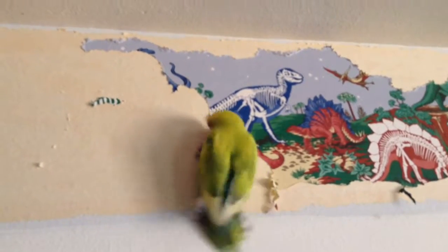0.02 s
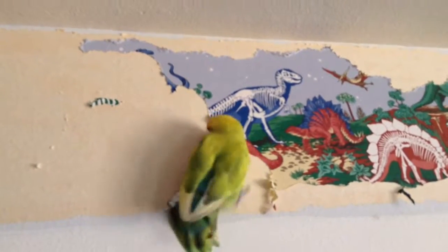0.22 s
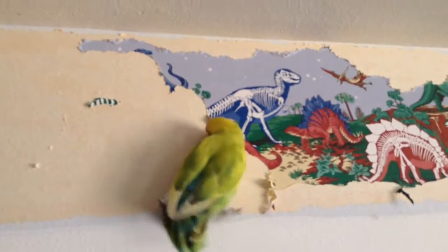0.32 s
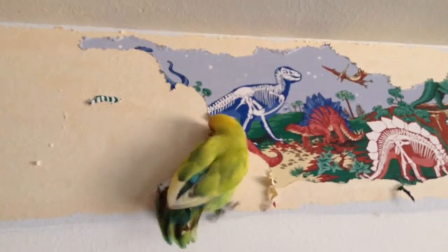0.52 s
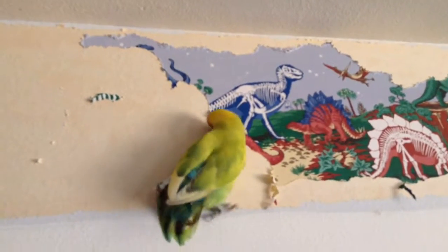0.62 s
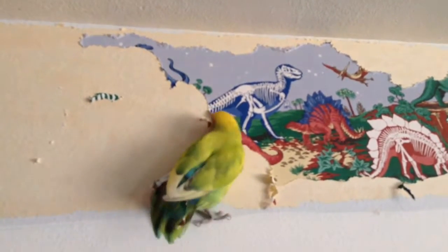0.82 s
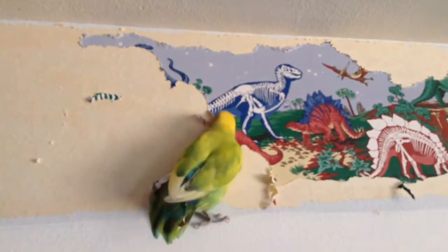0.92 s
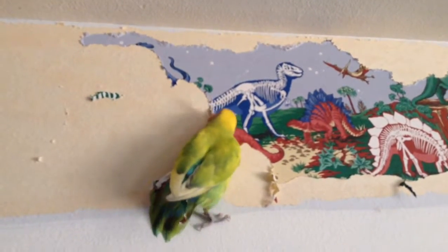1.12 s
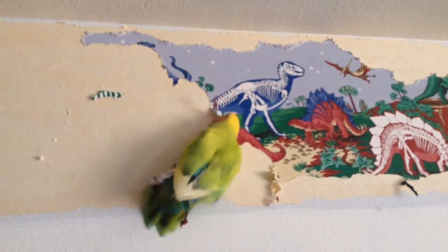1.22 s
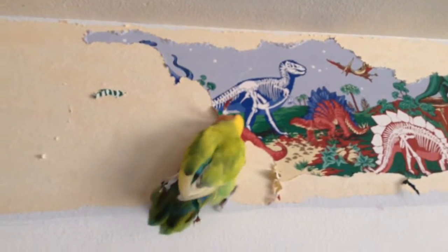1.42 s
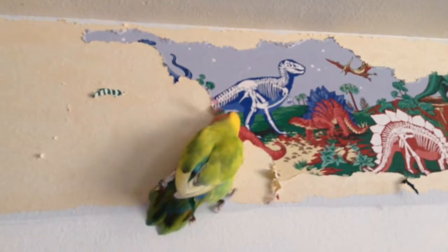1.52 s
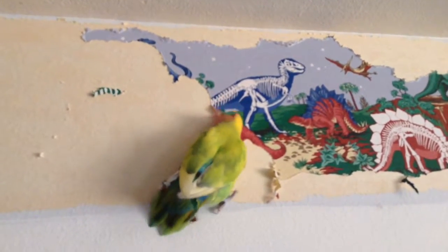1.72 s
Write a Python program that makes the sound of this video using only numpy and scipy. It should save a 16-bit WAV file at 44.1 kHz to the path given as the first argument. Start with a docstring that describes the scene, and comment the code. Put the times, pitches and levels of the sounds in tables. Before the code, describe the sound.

A small parrot lets out one shrill screech that cracks between whistle and rasp. A soft bump follows, then faint, quick wing flutter and a few tiny snaps of tearing paper, in a slightly echoing room with a low hum.

```python
"""A bare room: a small parrot gives one shrill, cracking screech as the echo of an earlier one dies away.
The two sides of its syrinx oscillate independently, so at times two notes sound at once. Under strain
the clean whistle breaks into a rasp, and period doubling adds an undertone at half the pitch.
Then come a soft bump, a flutter of wings pushing the air, and a few tiny snaps of a beak tearing
wallpaper. The walls reverberate, and a low hum lies under it all."""
import sys
import numpy as np
from scipy import signal
from scipy.fft import rfft, irfft
from scipy.io import wavfile
from scipy.ndimage import uniform_filter1d, minimum_filter1d

SR = 44100
rng = np.random.default_rng(int(sys.argv[2]) if len(sys.argv) > 2 else 0)


def generate_wav(signal):
    """Clip the signal to [-1, 1] and save it as 16-bit WAV at the path in sys.argv[1]."""
    frames = np.transpose(np.atleast_2d(signal))
    scaled = np.clip(frames, -1, 1) * 32767
    pcm = np.round(scaled).astype(np.int16)
    wavfile.write(sys.argv[1], SR, pcm)


N = 79380

# Spectrum of the room's hum: frequency_hz, relative_density_db
HUM_SPECTRUM = [(42, -37.5), (65, -19), (100, -15), (125, 2.5), (160, -3), (220, -8.5), (300, -20.5),
                (450, -25.5), (1100, -20), (2000, -17), (4000, -22.5), (7000, -27), (15000, -32.5)]
# Time for reverberation to fall by 60 dB: frequency_hz, decay_s
REVERB_TIMES = [(300, .3), (2000, .27), (5300, .285), (9000, .23), (13000, .21)]
# Spectrum of the earlier screech's echo: frequency_hz, relative_density_db
ECHO_SPECTRUM = [(880, -71), (1500, -42), (2570, -34), (3210, -10), (4210, -21.5), (4540, -5),
                 (5560, -13.5), (6360, -2), (6940, -19), (7140, -25), (7870, -23.5), (12900, -29.5),
                 (15000, -36)]
# Soft impacts of feet and body: centre_s, level_db, width_s
BUMPS = [(0.749, -48.5, 0.0097), (1.109, -62.5, 0.027), (1.237, -51.5, 0.0061)]
# Spectrum of those impacts: frequency_hz, relative_density_db
BUMP_SPECTRUM = [(45, -25), (150, 2), (330, -1.5), (430, -9), (560, -6.5), (900, -17.5), (3000, -39)]
# Breaking paper fibres: start_s, level_db, decay_s
SNAPS = [(1.192, -53, 0.0062), (1.215, -43, 0.0026), (1.23, -57, 0.0074), (1.7448, -36, 0.00075)]
# Spectrum of a snap: frequency_hz, relative_density_db
SNAP_SPECTRUM = [(500, -12), (1700, -7), (2600, -8.5), (4200, -10), (6000, -34), (8000, -2.5), (10500, -10),
                 (13500, -13), (16000, -17.5)]
# Wing beats: centre_s, swish_db, whoosh_db
WING_BEATS = [(0.814, -58, -56), (0.881, -55.5, -59), (0.943, -56.5, -51), (1.005, -61, -62.5),
              (1.068, -58, -52), (1.13, -57.5, -51), (1.189, -53.5, -56), (1.248, -54, -52),
              (1.307, -52.5, -48), (1.362, -53, -49), (1.425, -52, -52.5), (1.482, -53.5, -46),
              (1.542, -56, -61.5), (1.602, -57.5, -56), (1.667, -55, -62), (1.727, -55, -60.5),
              (1.785, -55.5, -57.5)]
# Spectrum of the feathers' swish: frequency_hz, relative_density_db
SWISH_SPECTRUM = [(30, -47.5), (100, 13), (250, -2.5), (420, -23.5), (620, 3), (1200, 5.5), (1700, -2),
                  (3300, -1), (4500, -4.5), (6000, -18), (15000, -18)]
# Hollow resonance of the whoosh: frequency_hz, gain_db
WHOOSH_RESONANCE = [(200, -43), (430, -13.5), (520, -4.5), (600, -1.5), (680, -3.5), (790, -14),
                    (1400, -73)]
# Spectrum of the rasp ahead of the throat: frequency_hz, relative_density_db
RASP_SPECTRUM = [(1500, -37.5), (2300, -25), (2900, -5.5), (3500, -18), (4500, 11.5), (5800, 13),
                 (8400, -14.5), (12200, -9.5), (15000, -21.5)]
# Response of throat and beak: frequency_hz, gain_db
THROAT_RESPONSE = [(1450, -14.5), (1850, -12.5), (2500, -7), (3300, 11), (4200, 7), (5000, -2), (5900, 2.5),
                   (6600, -7.5), (7100, -2.5), (8400, 0), (9300, -5), (10200, -11), (11600, -3),
                   (12600, -5), (13300, -18), (14000, -26), (16000, -19)]
# Unbroken stretches of voice, some overlapping: crack_ratio, tilt_db_per_octave, curve
# Curve rows: time_s, pitch_hz, level_db, overtone_db, undertone_db, roughness_ratio
# Overtones and undertone are relative to the whistle, ahead of the throat.
VOICE_STRETCHES = [ (0.102, -4.5, [(.170, 2993, -42, -5.5, -53, 0.1), (.184, 2814, -29, -7, -56.5, 0),
                   (.200, 3002, -33, -5, -50, 0), (.215, 3077, -21, -8, -51.5, 0),
                   (.232, 3164, -36.5, 10, -53, 0.14), (.245, 3230, -17, -7, -62.5, 0),
                   (.259, 3466, -21.5, -6.5, -41, 0.45), (.272, 3258, -27, -12.5, -29, 0.64),
                   (.315, 2955, -29.5, -19.5, -31, 0.77)]), (0.498, -5, [(.253, 4117, -28, 6, -32, 0.28),
                   (.264, 4235, -27.5, 0.5, -15, 0.75), (.274, 4200, -28.5, -5, 1, 0.7),
                   (.292, 4114, -30, -3.5, 0, 0.8), (.312, 4210, -35, -1.5, 3, 0.7)]),
                   (0.92, 0, [(.295, 3560, -31.5, -11.5, -4, 0.6), (.303, 3782, -28.5, -5.5, 3, 0.2),
                   (.312, 3775, -19, -13, -14.5, 0.57), (.330, 3537, -22, -9.5, -14.5, 0.48),
                   (.357, 3417, -26.5, -13.5, -8, 0)]), (0.201, 1.5, [(.381, 4102, -36.5, -15, -11.5, 1.1),
                   (.394, 4220, -21.5, -11.5, -5, 1.2), (.398, 4293, -20.5, -11.5, -26.5, 0.18),
                   (.423, 4315, -14, -8.5, -30, .05), (.432, 4100, -18.5, -9.5, -12.5, .2),
                   (.442, 3920, -29, -8.5, -10.5, 1)]), (.55, -2, [(.439, 3232, -17.5, -9.5, -46.5, 0.54),
                   (.464, 3100, -28, -6.5, -43, .8), (.474, 2966, -12.5, -7.5, -44.5, 0),
                   (.486, 2966, -21, -5, -43, .06), (.501, 2997, -19.5, -0.5, -47.5, 0.06),
                   (.521, 3036, -18, -6, -44.5, 0.18)]),
                   (0.702, -4, [(.521, 3064, -21.5, -9.5, -48.5, 0.16),
                   (.545, 3060, -24, -2.5, -39.5, 0.73), (.566, 3020, -35, 5.5, -42, 0.65),
                   (.591, 3100, -30, -7.5, -40.5, 0.42), (.610, 3150, -35.5, -14, -40.5, 0.4),
                   (.632, 3200, -30.5, -22, -40, 0.54), (.660, 3110, -35, -21, -39, 0.5)]),
                   (0, -6.5, [(.521, 3722, -11, -23, -41, .1), (.531, 3813, -5.5, -14.5, -42, .05),
                   (.548, 3814, -5.5, -14, -38, .05), (.553, 3580, -8.5, -6, -38, .1)]),
                   (.3, -1.5, [(.572, 3902, -16.5, -24, -15.5, 0), (.586, 3766, -21, -19.5, -13, 0.54),
                   (.597, 3823, -15, -17.5, -26, .2), (.604, 4028, -6.5, -18, -31, .13),
                   (.611, 4120, -8, -18.5, -33.5, 0.23), (.620, 3974, -7, -24, -30, 0.08)]),
                   (.4, -1.5, [(.619, 3970, -19.5, -6.5, -5.5, .25), (.629, 3890, -15, -11, -10.5, .3),
                   (.639, 3896, -25, -8.5, -7, .55), (.648, 3930, -24.5, -9.5, -1.5, .4),
                   (.665, 3950, -33, -8.5, -10, 0.5)]), (.5, 8.5, [(.672, 4053, -27, -6.5, -15, 1.1),
                   (.682, 4230, -24.5, -11.5, -9.5, 1.1), (.685, 4173, -8.5, -21.5, -22.5, 0.2),
                   (.689, 4564, -25.5, 4, -10.5, 1.02), (.703, 4300, -36, -11.5, -14, 1.1),
                   (.708, 4255, -10.5, -14.5, -44, 0.1), (.714, 4342, -25, -6, -20, 0.3)]),
                   (.5, 0.5, [(.686, 6153, -29, -4, -32, .14), (.696, 6680, -23, 18, -30.5, .1),
                   (.705, 6600, -15.5, 10, -29, 0.3), (.715, 6497, -23.5, 3.5, -39.5, .3),
                   (.729, 5890, -21, -7.5, -22.5, 0), (.744, 5914, -22.5, -5.5, -19, 0.4)]),
                   (.9, 4, [(.707, 4840, -20, -10, -3.5, 0.5), (.720, 5090, -18.5, -10, -11, 0.6),
                   (.733, 4913, -22.5, 1, -12, 1.1), (.742, 5172, -22, -8.5, -9.5, 1.06),
                   (.780, 5234, -31, -15, -15, 1)]), ]

CUTOFF_HZ = 15500


def amp(db):
    """Amplitude ratio: a factor of ten for every 20 dB."""
    return 10 ** (np.asarray(db) / 20)


def unit(x):
    """Normalisation to rms 1."""
    return x / np.sqrt(np.mean(x ** 2) + 1e-20)


def read(table, hz):
    """Interpolation on a logarithmic frequency axis."""
    frequencies, values = np.transpose(table)
    return np.interp(np.log(hz + 1), np.log(frequencies + 1), values)


def add(mix, start_s, sound):
    """Superposition: a sound sums into the mix from start_s on."""
    part = mix[max(round(start_s * SR), 0):][:len(sound)]
    part += sound[:len(part)]


def coloured(x, response):
    """Linear filtering: the spectrum is multiplied by a response."""
    return irfft(rfft(x, N) * amp(read(response, np.fft.rfftfreq(N, 1 / SR))), N)


def noise(spectrum, size=N, shift=1):
    """Spectral shaping: noise of rms near 1, its spectrum transposed by the ratio shift."""
    n = max(size, SR // 5)
    gain = amp(read(spectrum, np.fft.rfftfreq(n, 1 / SR) / shift))
    return unit(irfft(rfft(rng.standard_normal(n)) * gain, n))[:size]


def wobble(hz, size):
    """Random modulation: low-pass noise of rms near 1, up to about hz."""
    n = max(size, SR // 5)
    gain = np.exp(-.5 * (np.fft.rfftfreq(n, 1 / SR) / hz) ** 2)
    return unit(irfft(rfft(rng.standard_normal(n)) * gain, n))[:size]


def hops(size, mean_hold_s=.027):
    """A Poisson process: random values of rms near 1, held between slightly smoothed jumps."""
    step = np.cumsum(rng.random(N)[:size] < 1 / (mean_hold_s * SR))
    return uniform_filter1d(np.sqrt(3) * rng.uniform(-1, 1, SR)[step], size=30)


def swell(centre_s, width_s):
    """A Gaussian envelope with standard deviation width_s."""
    return np.exp(-.5 * ((np.arange(N) / SR - centre_s) / width_s) ** 2)


def room_hum():
    """Stationary noise: energy gathered at low frequencies is heard as a hum."""
    return amp(-60) * noise(HUM_SPECTRUM)


def in_room(x, wet_db, gap_s=.002):
    """Reverberation: dense wall reflections follow the direct sound, each band dying at its own rate."""
    hz, t, bands = signal.stft(rng.standard_normal(SR // 2), SR, nperseg=256)
    decay = amp(-60 * t / read(REVERB_TIMES, hz)[:, None])
    tail = signal.istft(bands * decay, SR, nperseg=256)[1]
    out = x.copy()
    add(out, gap_s, amp(wet_db) * signal.fftconvolve(x, tail / np.linalg.norm(tail)))
    return out


def echo():
    """Free decay: the earlier screech's reverberant field fades at the room's rate for 5 kHz."""
    t = np.arange(N) / SR
    return amp(-30.5) * noise(ECHO_SPECTRUM) * amp(-60 * t / read(REVERB_TIMES, 5000))


def bumps():
    """Damped impact: feet and body give dull pulses of noise with no ring."""
    return noise(BUMP_SPECTRUM) * sum(amp(db) * swell(s, width_s) for s, db, width_s in BUMPS)


def paper_snaps():
    """Fracture: fibres break in the beak, each in a bright burst that decays exponentially."""
    out, t = np.zeros(N), np.arange(SR // 10) / SR
    for start_s, db, decay_s in SNAPS:
        add(out, start_s, amp(db) * np.exp(-t / decay_s) * noise(SNAP_SPECTRUM, len(t)))
    return out


def wings(width_s=.012):
    """Aerodynamic noise: each beat is a swish of feathers and a hollow whoosh of air."""
    swish = sum(amp(db) * (swell(s, width_s) + .12 * swell(s, 2 * width_s)) for s, db, _ in WING_BEATS)
    whoosh = sum(amp(db) * swell(s, width_s) for s, _, db in WING_BEATS)
    even_noise = np.sign(noise(WHOOSH_RESONANCE))  # clipping evens out its strength
    air = unit(coloured(even_noise, WHOOSH_RESONANCE))
    return swish * noise(SWISH_SPECTRUM) + whoosh * air


def syrinx(crack, tilt_db, curve):
    """Nonlinear oscillation: a strained whistle hops, doubles its period and rasps."""
    times, *columns = np.transpose(curve)
    t = np.arange(times[0], times[-1], 1 / SR)
    n = len(t)
    pitch_hz, level_db, overtone_db, undertone_db, rough = (np.interp(t, times, c) for c in columns)
    rough = np.clip(rough, 0, 1)
    strain = np.minimum(2 * amp(overtone_db), 1)  # a bright voice is also an unsteady one
    jitter = .032 * rough * wobble(hz=700, size=n)
    tremble = .014 * strain * wobble(hz=220, size=n)
    pitch_hops = .027 * crack * hops(n, mean_hold_s=.003)
    phase = 2 * np.pi * np.cumsum(pitch_hz * (1 + jitter + tremble + pitch_hops)) / SR

    # The edge is all that surrounds the whistle: rasp, overtones and half-pitch partials.
    rasp_shift = (pitch_hz.mean() / 3950) ** .3  # the rasp partly follows the pitch
    edge = amp(-2) * rough ** 1.5 * noise(RASP_SPECTRUM, n, rasp_shift)
    full_voice_db, shimmer_depth = -21, .7
    # A soft, clean whistle loses its top overtones.
    dulling_db = .8 * np.minimum(level_db - full_voice_db, 0) * (1 - rough) ** 2
    phase += .18 * strain * wobble(hz=300, size=n)  # phase noise broadens every partial
    for ratio in (.5, 1.5, 2, 2.5, 3, 3.5, 4, 5):
        half_order = ratio % 1 > 0
        partial_db = undertone_db if half_order else overtone_db
        slope_db = tilt_db * np.log2(max(ratio / 2, 1)) + dulling_db * max(ratio - 3, 0)
        shimmer = 1 + shimmer_depth * rough * wobble(hz=300, size=n)
        slip_rad = .55 * wobble(hz=300, size=n) * half_order
        partial = np.sqrt(2) * np.sin(ratio * phase + slip_rad) * (pitch_hz * ratio < CUTOFF_HZ)
        edge += amp(partial_db + slope_db) * shimmer * partial

    shimmer = 1 + shimmer_depth * rough * wobble(hz=300, size=n)
    hop_db = 4 * crack * hops(n, mean_hold_s=.003)
    whistle = np.sqrt(2) * np.sin(phase) * shimmer * unit(amp(hop_db))
    attack_s, release_s = .003, .0025
    gate = np.clip(np.minimum((t - t[0]) / attack_s, (t[-1] - t) / release_s), 0, 1)
    envelope = np.sin(gate * np.pi / 2) ** 2 * amp(level_db)
    return envelope * whistle, envelope * edge


def screech():
    """Source and filter: the throat colours the voice's edge; so small a bird radiates no low notes."""
    whistles, edges = np.zeros((2, N))
    for crack, tilt_db, curve in VOICE_STRETCHES:
        start_s = curve[0][0]
        whistle, edge = syrinx(crack, tilt_db, curve)
        add(whistles, start_s, whistle)
        add(edges, start_s, edge)
    radiation = signal.butter(10, 1700, "high", fs=SR, output="sos")
    return signal.sosfilt(radiation, whistles + coloured(edges, THROAT_RESPONSE))


def scene():
    """Superposition: voice, movement and paper share one room, over its low hum."""
    voice = in_room(screech(), wet_db=-6.5) + echo()
    movement = in_room(wings() + bumps(), wet_db=-6.5)
    paper = in_room(paper_snaps(), wet_db=-5.5)
    return (voice + movement + paper + room_hum())[None]


def record(dry):
    """Peak and band limiting: the gain dips under the loudest notes, then a low-pass trims the top."""
    ceiling, span = .96, round(.002 * SR)
    needed_gain = ceiling / np.maximum(abs(dry), ceiling)
    gain = uniform_filter1d(minimum_filter1d(needed_gain, 2 * span), span)
    low_pass = signal.firwin(511, CUTOFF_HZ, window=("kaiser", 9), fs=SR)
    return signal.oaconvolve(dry * gain, low_pass[None], "same")


dry = scene()
out = record(dry)
generate_wav(out)
```